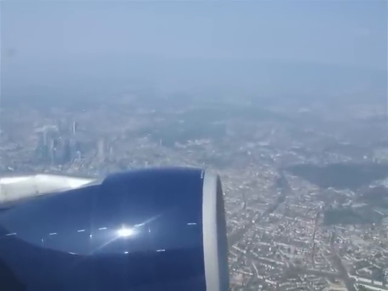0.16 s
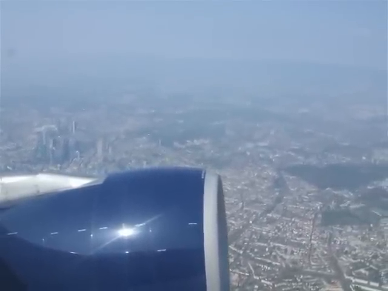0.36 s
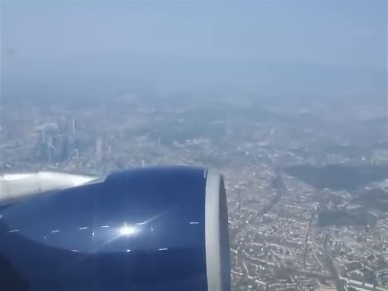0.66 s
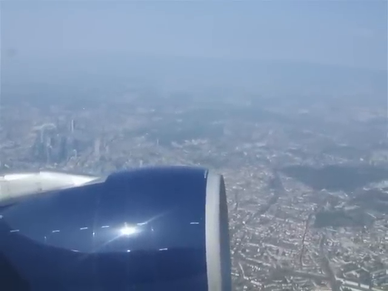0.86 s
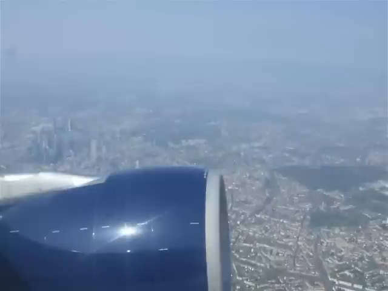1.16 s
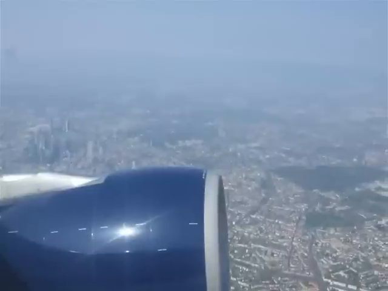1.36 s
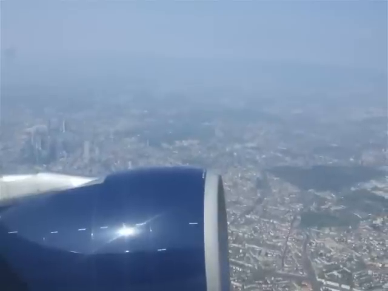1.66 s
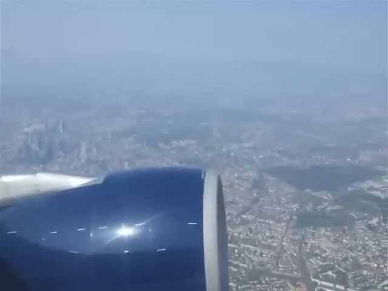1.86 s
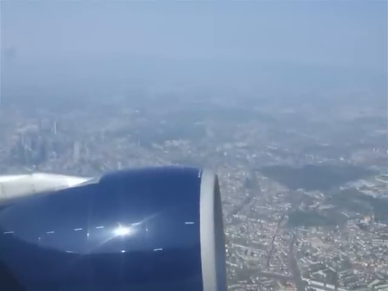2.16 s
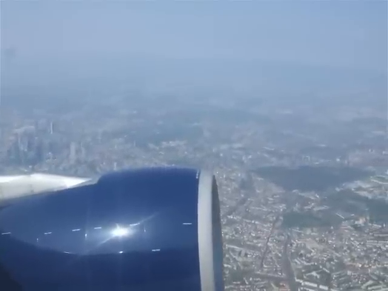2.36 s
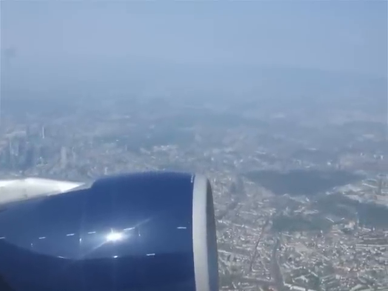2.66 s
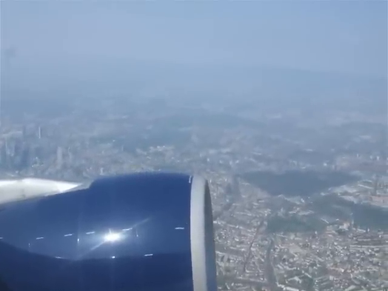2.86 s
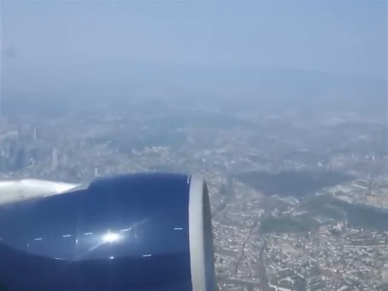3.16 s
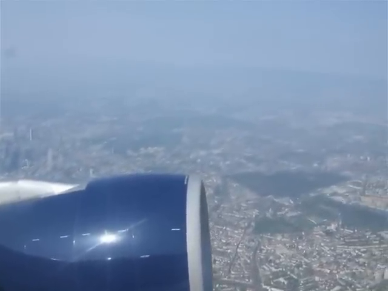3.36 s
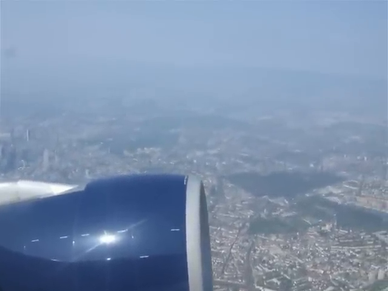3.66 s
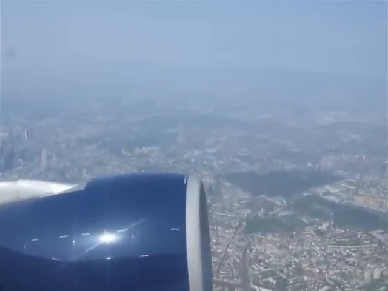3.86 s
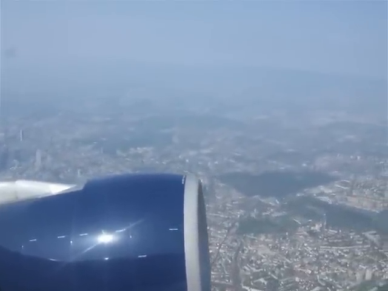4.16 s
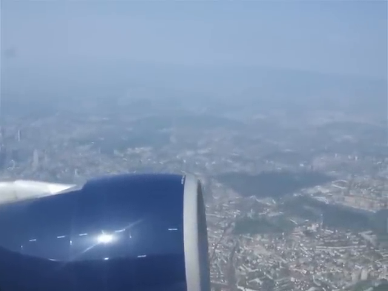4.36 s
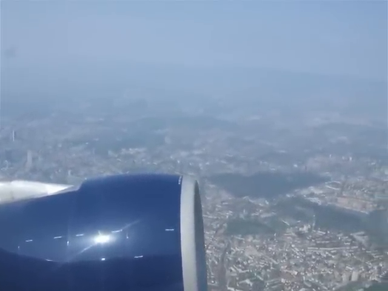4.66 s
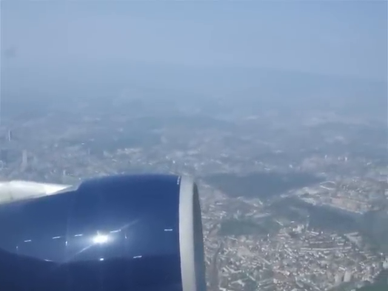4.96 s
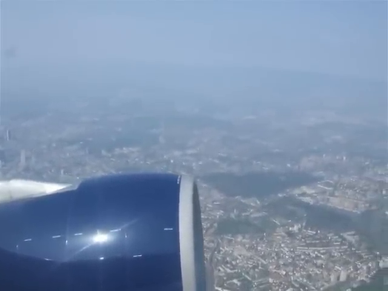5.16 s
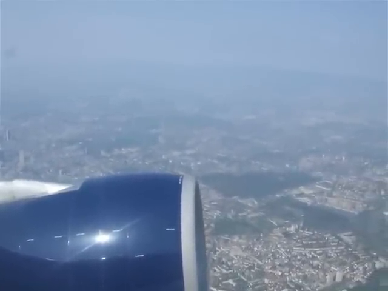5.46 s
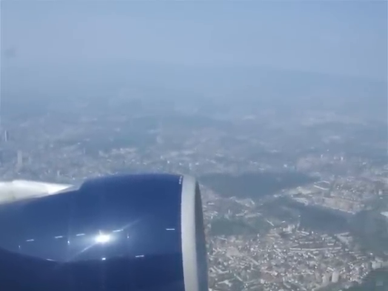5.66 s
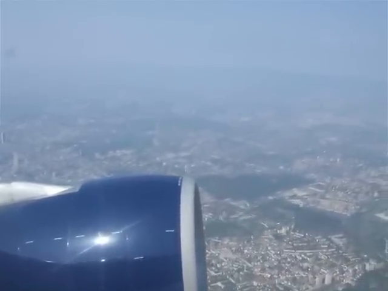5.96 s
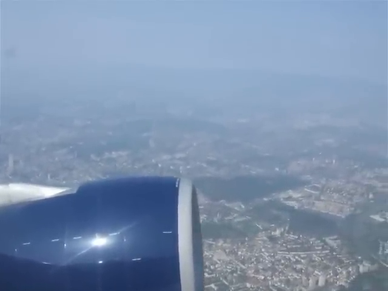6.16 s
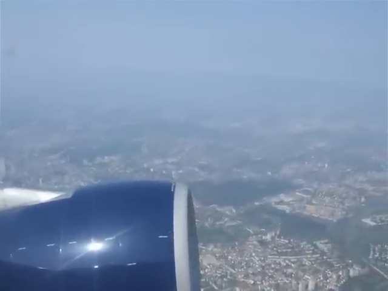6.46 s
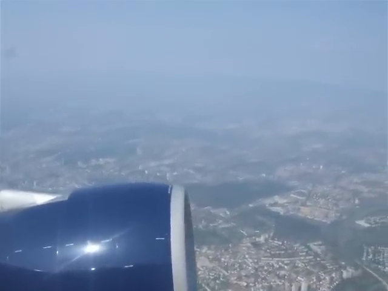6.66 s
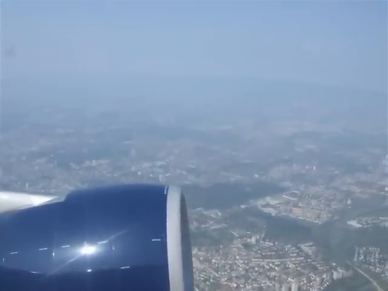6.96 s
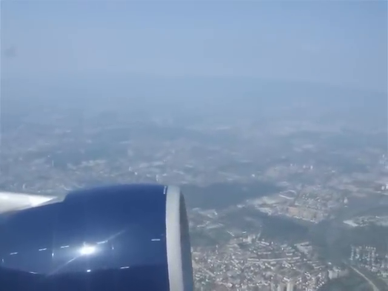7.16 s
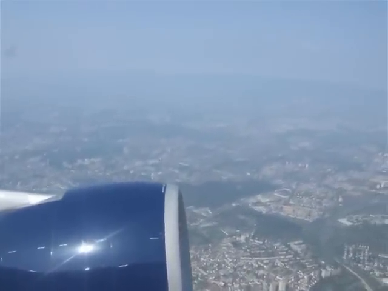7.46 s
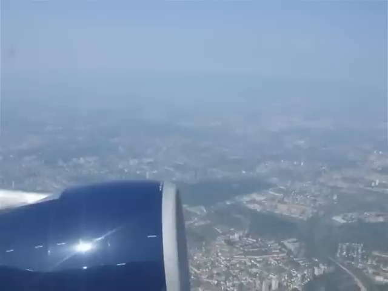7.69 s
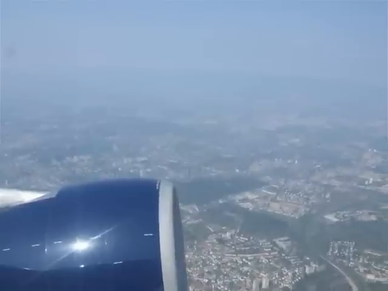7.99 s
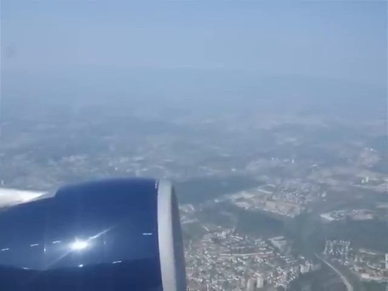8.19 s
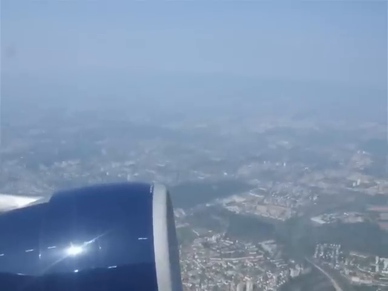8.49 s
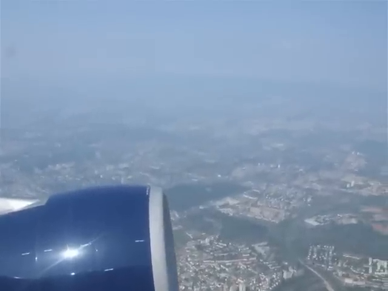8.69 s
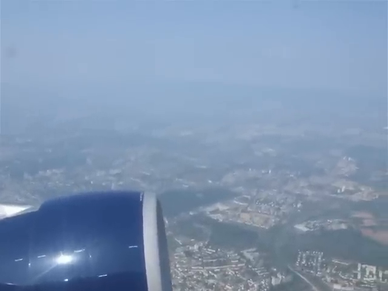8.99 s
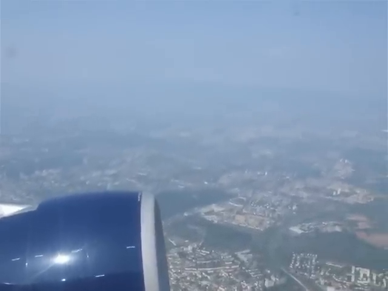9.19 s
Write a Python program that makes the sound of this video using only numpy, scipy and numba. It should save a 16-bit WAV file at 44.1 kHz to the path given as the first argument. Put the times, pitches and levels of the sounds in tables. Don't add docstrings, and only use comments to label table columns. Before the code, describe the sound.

Inside a flying passenger jet, thick low engine hum and saw-like buzz hold constant over wind rumble, soft hiss and tiny trim knocks.

```python
import sys
import numpy as np
from scipy import signal
from scipy.fft import rfft, irfft, next_fast_len
from scipy.io import wavfile
from scipy.ndimage import map_coordinates
from numba import njit

SR = 44100
rng = np.random.default_rng(int(sys.argv[2]) if len(sys.argv) > 2 else 0)


def voltage_ratio(level):
    return 10 ** (np.asarray(level, float) / 20)


def int16_out(signal):
    q = np.round(np.clip(np.atleast_2d(signal).T, -1, 1) * 32767)
    wavfile.write(sys.argv[1], SR, q.astype(np.int16))


N = 411453
T = np.arange(N) / SR

# time in seconds, near fan rate in rpm, far fan rate in rpm.
FAN_RATES = [(0.0, 3130.39, 3138.92), (0.62, 3130.61, 3137.53), (1.24, 3129.04, 3136.89),
             (1.87, 3130.53, 3137.2), (2.49, 3130.69, 3137.63), (3.11, 3129.66, 3138.63),
             (3.73, 3130.38, 3138.48), (4.35, 3131.39, 3137.98), (4.98, 3131.06, 3137.57),
             (5.6, 3130.59, 3138.04), (6.22, 3130.5, 3138.9), (6.84, 3129.32, 3138.83),
             (7.46, 3132.36, 3138.19), (8.09, 3131.79, 3138.01), (8.71, 3132.68, 3139.07),
             (9.33, 3133.74, 3139.22)]
WHINE_MULTIPLE = 34


def curve(table, col):
    rows = np.array(table, float)
    return np.interp(T, rows[:, 0], rows[:, col])


def walk(rate, size=N):
    knots = rng.standard_normal(int(rate * N / SR) + 3)
    wander = map_coordinates(knots, [np.linspace(1, len(knots) - 2, size)], order=2)
    return wander / wander.std()


def band(x, lo_hz, hi_hz):
    sos = signal.butter(2, [lo_hz, min(hi_hz, SR / 2.2)], "bandpass", fs=SR, output="sos")
    return signal.sosfilt(sos, x)


def coloured(spectrum):
    size = next_fast_len(N)
    hz = np.maximum(np.arange(size // 2 + 1) * SR / size, 1)
    points = np.array(spectrum, float)
    density_db = np.interp(np.log(hz), np.log(points[:, 0]), points[:, 1])
    return rfft(rng.standard_normal(size)) * voltage_ratio(density_db) * np.sqrt(SR / 2), hz, size


def buffet():
    # centre in seconds, level change in dB.
    gusts = [(0.22, 2.5), (0.62, 2), (0.81, -3.5), (1.68, -2.5), (1.95, -5), (2.6, -5.1), (2.96, -6.5),
             (3.18, 1.5), (3.56, -4), (3.82, 3.5), (4.29, 3.6), (4.48, 2.6), (4.62, -4.5), (4.74, 2),
             (4.94, 1.5), (5.13, 3.5), (6.3, 2.5), (6.45, 3.5), (6.96, 4.5), (7.37, -4.5), (7.55, -4.1),
             (7.72, -3.6), (7.83, -2.5), (8.13, -5), (8.56, 2.5), (8.67, 2.7), (8.81, -4.5), (9.11, -1)]
    half_length_s, flutter_db = 0.052, 1.27
    swells = sum(db * np.exp(-((T - s) / half_length_s) ** 2) for s, db in gusts)
    return swells + flutter_db * walk(14.0)


def airflow(spectrum, edges_hz, gust_db, own_db, own_rate):
    noise, hz, size = coloured(spectrum)
    out = np.zeros(N)
    for lo, hi in zip(edges_hz, edges_hz[1:]):
        level_db = gust_db * min(1, 2600 / lo) + own_db * walk(own_rate)
        out += voltage_ratio(level_db) * irfft(noise * (hz >= lo) * (hz < hi), size)[:N]
    return out


def rumble():
    # frequency in Hz, density in dB per Hz.
    low_density = [(15, -63), (30, -52.5), (62, -45), (82, -49), (107, -37.5), (125, -41), (148, -41),
                   (175, -48), (225, -47), (262, -50.5), (340, -52.5), (390, -58.5), (530, -65),
                   (600, -69.5)]
    return airflow(low_density, [8, 45, 90, 180, 300, 420, 600], 0.86 * walk(3.5), own_db=0.45, own_rate=4.3)


def hiss(buffet_db):
    # frequency in Hz, density in dB per Hz.
    high_density = [(600, -69), (670, -69.5), (800, -74), (950, -75.5), (1050, -72), (1250, -79.5),
                    (1700, -82), (2200, -81.5), (2600, -85.5), (3500, -90), (4600, -93), (6200, -96.5),
                    (9000, -103), (15500, -115)]
    return airflow(high_density, [600, 1150, 2300, 4000, 7000, 22000], 0.45 * buffet_db, own_db=0.68, own_rate=7.0)


def ticks():
    # start in seconds, peak in dB, resonance in Hz, knock peak in dB,
    # 60 dB decay time in seconds.
    contacts = [(.6232, -47, 8000, -19, .02), (0.699, -52, 7500, -29, .02), (.762, -58, 7300, -23, .02),
                (.770, -47, 7300, -40, .03), (.862, -48, 8000, -60, .08), (.885, -50, 8000, -60, .02),
                (7.285, -36, 5400, -50, .025), (7.286, -46, 10500, -60, .015), (7.288, -41, 8200, -60, .03),
                (7.319, -44, 4200, -60, .03), (7.324, -41, 7800, -60, .02), (7.563, -48, 7000, -60, .03),
                (7.585, -47, 6500, -60, .06), (9.167, -46, 7000, -40, .04)]
    # frequency in Hz, relative share.
    modes = [(400, 1.1), (620, .4), (920, 1), (1250, .5), (2100, .3)]
    contact_rise_s, ring_cycles = .0007, 17
    out = np.zeros(N)
    age = np.arange(SR // 5) / SR
    for s, db, hz, knock_db, t60 in contacts:
        i = int(s * SR)
        tick = band(rng.standard_normal(len(age)), hz / 1.23, hz * 1.13)
        tick = tick * np.exp(-np.log(1000) * age / t60)
        knock = np.zeros(len(age))
        for mode_hz, share in modes:
            decay = np.exp(-np.log(1000) * age * mode_hz / ring_cycles)
            knock += share * np.sin(2 * np.pi * mode_hz * age) * decay
        knock = knock * (1 - np.exp(-age / contact_rise_s))
        tick = voltage_ratio(db) * tick / np.abs(tick).max()
        knock = voltage_ratio(knock_db) * knock / np.abs(knock).max()
        out[i:i + len(age)] += (tick + knock)[:N - i]
    return out


def rustles():
    # centre in seconds, length in seconds, level in dB rms, top frequency in Hz.
    brushes = [(0.484, .025, -53, 4500), (1.318, .04, -56, 9000), (3.18, .07, -54, 5000),
               (3.05, .04, -57, 7000), (3.80, 0.069, -49, 4500), (3.82, .06, -54, 8460),
               (4.40, .03, -57, 6000), (5.928, .04, -54, 6000), (6.47, .05, -56, 5000),
               (7.30, .06, -55, 9000), (7.593, .05, -54, 8000), (8.69, .05, -59, 6000)]
    out = np.zeros(N)
    age = np.arange(SR // 5) / SR
    for s, length, db, top_hz in brushes:
        i = int((s - .1) * SR)
        puff = band(rng.standard_normal(len(age)), 1500, top_hz)
        swell = np.exp(-((age - .1) / length * 2) ** 2)
        out[i:i + len(age)] += voltage_ratio(db) * puff / puff.std() * swell
    return out


def core():
    # time in seconds, shaft rate in Hz, level in dB.
    shaft = [(0.0, 256.455, -28.0), (0.86, 256.754, -28.7), (1.17, 255.282, -24.4), (1.48, 256.623, -28.5),
             (2.69, 256.201, -27.6), (2.99, 255.466, -28.6), (3.61, 256.077, -26.4), (3.91, 255.443, -26.0),
             (4.24, 256.495, -27.4), (5.77, 255.625, -26.9), (6.07, 254.862, -25.9), (6.6, 256.418, -29.2),
             (6.95, 254.179, -25.7), (7.55, 254.264, -27.4), (8.56, 255.274, -24.9), (8.87, 253.587, -27.4),
             (9.33, 255.472, -22.5)]
    # pump tone in Hz, level in dB rms.
    pumps = [(558.5, -51.5), (799.8, -62)]
    angle = 2 * np.pi * (.427 + np.cumsum(curve(shaft, 1)) / SR)
    hum = voltage_ratio(curve(shaft, 2) + 0.75 + .5 * walk(5.5)) * np.sin(angle)
    octave = voltage_ratio(-55 + 5.1 * walk(1.2)) * np.sin(2 * angle)
    out = hum + octave
    for hz, db in pumps:
        out += voltage_ratio(db + 2 * walk(1.2)) * np.sin(2 * np.pi * hz * T)
    return np.sqrt(2) * out


def fan(buffet_db, rpm, start, spread, tones, weak_col, scatter_db, wobble_db, wobble_rad, gust_share,
        swell_db=None):
    # multiple of the shaft rate, near fan level in dB, far fan level in dB.
    outline = [(10.8, -75, -71), (20, -79, -78), (41, -69, -74), (50, -74.5, -72), (60, -76, -86),
               (70, -81.5, -93), (85.4, -81.5, -80), (110, -86, -93)]
    steps, size = 140, 8192
    order = np.arange(1, 111)
    moments = np.linspace(0, N - 1, steps).astype(int)

    weak = np.array(outline, float)
    db = np.interp(order, weak[:, 0], weak[:, weak_col], left=-90)
    db = db + scatter_db * rng.standard_normal(len(order))
    for k, tone_db in tones:
        db[int(round(k)) - 1] = tone_db
    wobble = np.array([0.62 * walk(1.5, size=steps) + 1.0 * walk(6.0, size=steps) for _ in order]).T
    db = db + wobble_db * np.clip(order / 12 - .2, .15, 1) * wobble
    gust_db = buffet_db[moments]
    db = db + np.outer(gust_db, gust_share * np.clip(order / 20 - .3, 0, 1))
    if swell_db is not None:
        db[:, WHINE_MULTIPLE - 1] = swell_db[moments] + 1.2 + .45 * gust_db

    drift = np.array([walk(2.5, size=steps) for _ in order]).T
    drift = wobble_rad * np.sqrt(order) * np.minimum(order / 12, 1) * drift
    angle = 2 * np.pi * spread * order ** 2 + drift
    lines = np.zeros((steps, size // 2 + 1), complex)
    lines[:, order] = voltage_ratio(db) * np.exp(1j * angle) * size / np.sqrt(2)
    turn = irfft(lines, size, axis=1)
    turn = np.hstack([turn, turn[:, :1]])
    place = (start + np.cumsum(rpm / 60 / SR)) % 1 * size
    return map_coordinates(turn, [np.linspace(0, steps - 1, N), place], order=1)


def far_fan(buffet_db):
    # multiple of the shaft rate, level in dB rms.
    shocks = [(3, -37), (5, -39), (7, -39), (11, -59), (19, -62), (21, -66), (23, -66), (26, -69),
              (28, -69), (29, -63), (30, -66), (31, -57), (32, -70), (33, -67), (34, -62), (35, -69),
              (36, -65), (37, -61), (41, -66), (42, -67), (43, -65), (45, -71), (46, -68), (49, -72),
              (52, -71), (56, -73), (57, -71), (59, -74), (62, -73), (63, -72)]
    # multiple of the shaft rate, level in dB rms.
    shake = [(1, -41), (2, -56)]
    return fan(buffet_db, curve(FAN_RATES, 2), .828, .770, shake + shocks, weak_col=2, scatter_db=1.5,
               wobble_db=1.7, wobble_rad=0.14, gust_share=0.66)


def near_fan(buffet_db):
    # multiple of the shaft rate, level in dB rms.
    shocks = [(5, -26), (6, -30), (7, -40), (8, -42), (9, -41), (10, -46), (16, -51), (18, -59), (24, -52),
              (25, -55), (27, -59), (28, -66), (29, -59), (33, -61), (34, -46), (36, -66), (37, -57),
              (38, -64), (39, -55), (40, -63), (42, -53), (43, -66), (47, -63), (51, -60), (54, -69),
              (57, -68), (58, -69), (59, -66), (63, -62), (76, -72)]
    # multiple of the shaft rate, level in dB rms.
    shake = [(2, -37.5), (3, -38.5), (4, -54)]
    # time in seconds, level in dB.
    whine = [
        (0, -48.5),
        (.3, -50.5),
        (2.1, -47.5),
        (2.7, -49),
        (4.5, -45),
        (5.8, -49),
        (6.6, -46.5),
        (8.4, -45),
        (9.0, -49.5),
        (9.33, -47.5),
    ]
    return fan(buffet_db, curve(FAN_RATES, 1), .672, .378, shake + shocks, weak_col=1, scatter_db=4.0,
               wobble_db=1.17, wobble_rad=0.096, gust_share=0.62, swell_db=curve(whine, 1))


def scene():
    buffet_db = buffet()
    near = near_fan(buffet_db)
    far = far_fan(buffet_db)
    engines = voltage_ratio(-0.12) * (near + far + core())
    return (engines + rumble() + hiss(buffet_db) + ticks() + rustles())[None]


@njit
def follow(x, attack, release, start):
    out, level = np.empty(len(x)), start
    for i in range(len(x)):
        peak = abs(x[i])
        level += (peak - level) * (attack if peak > level else release)
        out[i] = level
    return out


def squeeze(x):
    target = 0.21
    level = follow(x[0], 1 / (0.0015 * SR), 1 / (.07 * SR), target)
    x = x * (target / level) ** .3 * voltage_ratio(0.19)
    return x / (1 + (np.abs(x) / .43) ** 6) ** (1 / 6)


def self_noise():
    # frequency in Hz, density in dB per Hz.
    floor_density = [(600, -104), (6000, -101), (9000, -99.5), (12500, -99.5), (15500, -100)]
    noise, _, size = coloured(floor_density)
    return irfft(noise, size)[:N]


def clock_error(x):
    error_hz = [3900, 7800, 12100, 15600]
    error_us = [2.0, 1.7, 2.2, 1.2]
    error_s = sum(us / 10 ** 6 * np.sin(2 * np.pi * hz * T) for hz, us in zip(error_hz, error_us))
    return x + np.gradient(x, axis=1) * SR * error_s


def band_limit(x):
    return signal.sosfilt(signal.butter(12, 15710, fs=SR, output="sos"), x)


def record(dry):
    x = squeeze(dry) + self_noise()
    x = clock_error(x) - .0046
    return band_limit(x)


dry = scene()
out = record(dry)
int16_out(out)
```